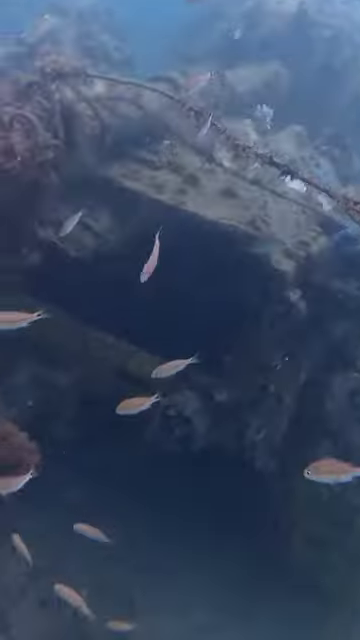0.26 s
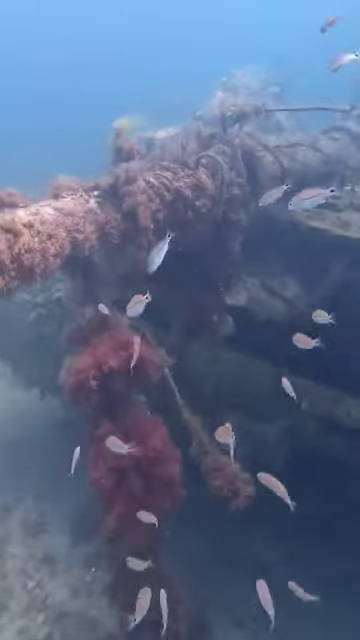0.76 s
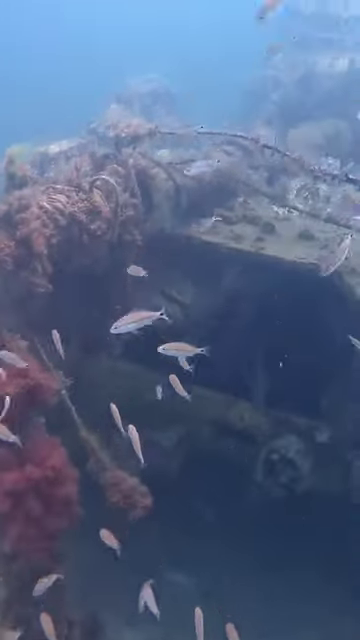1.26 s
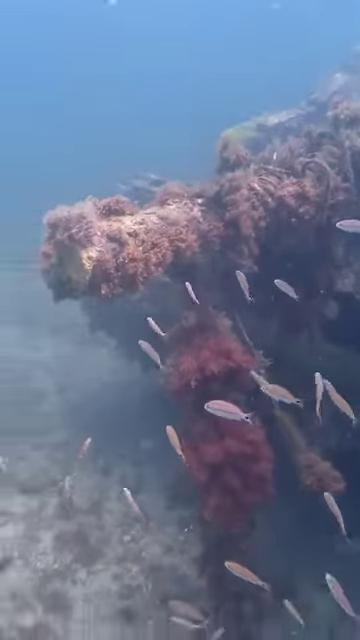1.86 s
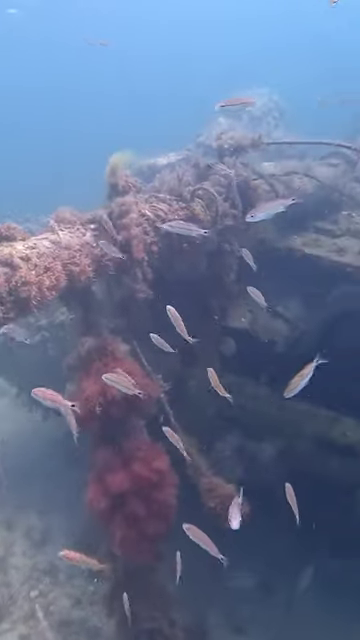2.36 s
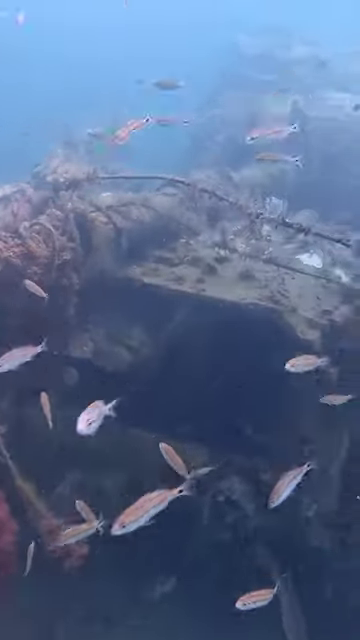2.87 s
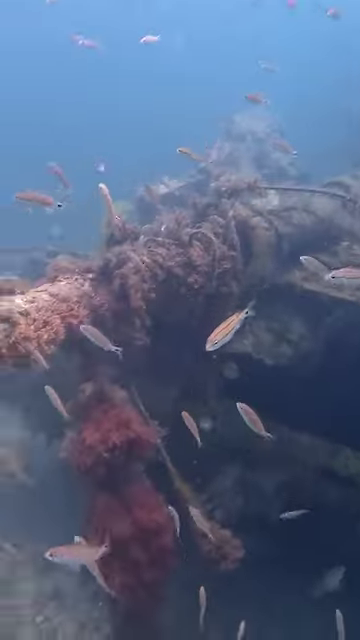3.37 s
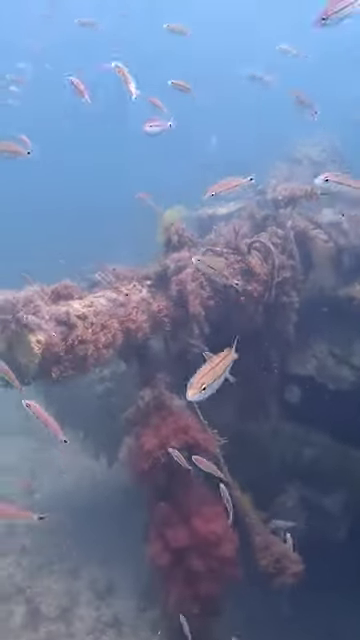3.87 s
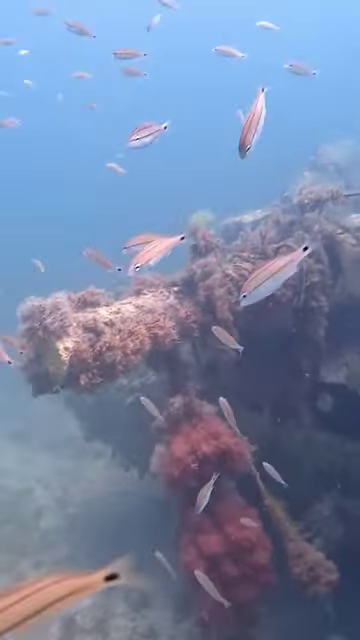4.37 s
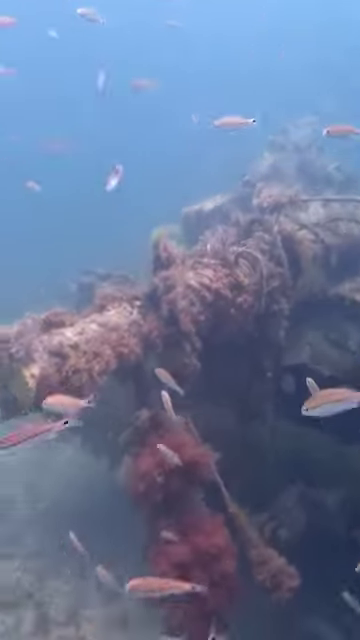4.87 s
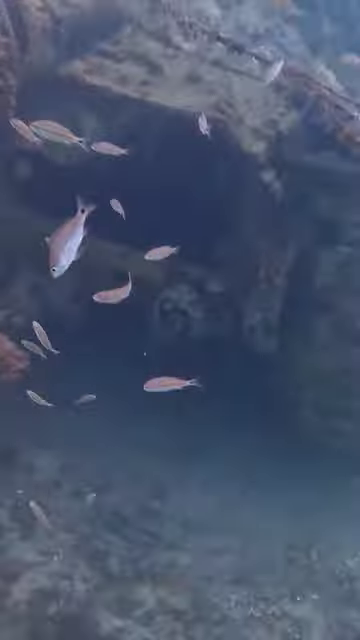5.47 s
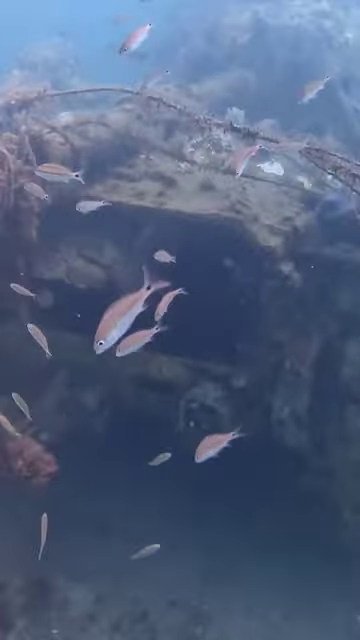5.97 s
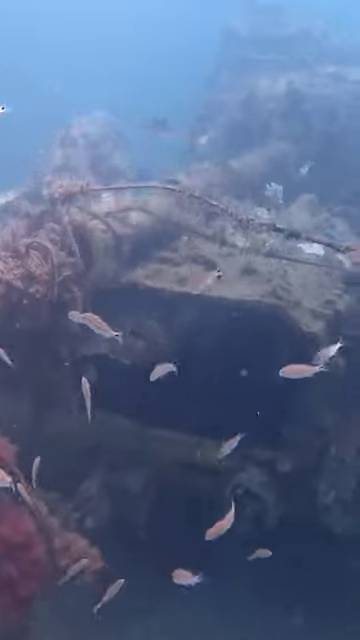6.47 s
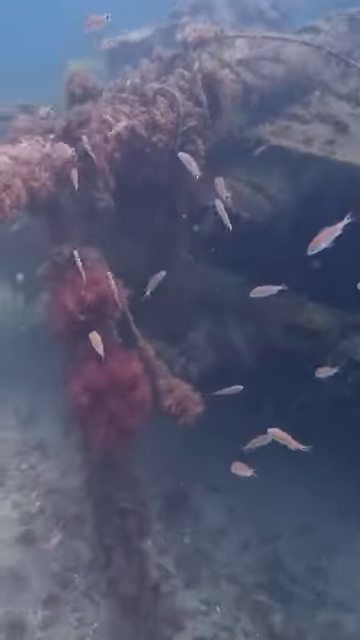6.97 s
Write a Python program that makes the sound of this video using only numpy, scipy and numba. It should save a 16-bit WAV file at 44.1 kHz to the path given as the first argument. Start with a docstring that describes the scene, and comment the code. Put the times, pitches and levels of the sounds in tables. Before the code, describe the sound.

Dull, low buffeting of water opens the scene, heard from a camera swaying under the sea in a sealed case. Irregular clicks of snapping shrimp ring briefly in the case all the way through. The water calms, then swells again about halfway, with small bubble pops and soft gurgles around it. A strong thumping surge arrives late and weaker ones follow. The rumble leans left, the clicks are brighter on the right.

```python
"""A camera in a sealed housing sways on a wreck under water. From the start, surges push eddies over its
two microphone ports, and snapping shrimp near and far set the housing ringing. The flow eases after 1.7 s;
near 3 s air pockets pop on the shell. A surge at 3.9 s is followed by more pops and by gurgling round the
seams. A strong surge comes at 5.8 s, weaker ones from 6.6 s. A faint hum runs throughout.
The left port is louder in the bass, the right in the treble."""
import sys
import numpy as np
from scipy import signal
from scipy.io import wavfile
from scipy.ndimage import uniform_filter1d
from numba import njit

SR = 44100
rng = np.random.default_rng(int(sys.argv[2]) if len(sys.argv) > 2 else 0)


def digitize_waveform(pressure):
    """Quantize a signal to 16-bit integers and store it at the path in sys.argv[1].

    Rows of a 2-D input are taken as channels; values are limited to [-1, 1].
    """
    field = np.atleast_2d(pressure).T
    bounded = np.clip(field, -1, 1)
    quanta = np.round(bounded * 32767).astype(np.int16)
    wavfile.write(sys.argv[1], SR, quanta)


N = 318843

# flow over the ports: time_s, level_db, small_eddy_db
SURGE_CURVE = [(0.0, -19.5, -7), (0.16, -22, -6), (0.22, -28, -18), (0.4, -32, -16.5), (0.47, -14.5, -9.5),
               (0.53, -29.5, -2.5), (0.58, -15, 0.5), (0.63, -28.5, -1), (0.7, -23, -4.5),
               (0.88, -22.5, -10), (0.97, -37.5, -12), (1.03, -22.5, -12.5), (1.15, -43.5, -7),
               (1.3, -25, -7), (1.38, -14, -1.5), (1.43, -18.5, -12.5), (1.5, -18, -4),
               (1.56, -19.5, -12.5), (1.61, -25.5, -14.5), (1.66, -25, -10), (1.83, -44, -21),
               (2.05, -40.5, -27), (2.13, -21, -13), (2.17, -26.5, -21.5), (2.29, -28.5, -9),
               (2.41, -25, -22), (2.5, -37.5, -24), (2.66, -47, -4), (2.86, -31.5, -7.5),
               (2.94, -38.5, 0.5), (3.06, -27.5, -11.5), (3.22, -33, -11), (3.26, -24.5, -22.5),
               (3.36, -37, -8), (3.54, -34, -26.5), (3.79, -35.5, -25), (3.85, -16, -9), (3.99, -20, -5.5),
               (4.05, -28.5, -17.5), (4.11, -16, -18), (4.17, -36, -27), (4.33, -48.5, -1),
               (4.81, -25, -13), (4.87, -23.5, -16.5), (4.97, -14.5, -18), (5.15, -33, -11.5),
               (5.38, -27.5, -21), (5.48, -51, -15), (5.56, -23.5, -18), (5.68, -38, -2.5),
               (5.76, -12.5, -3), (5.86, -25.5, -3.5), (5.94, -19, -14), (6.08, -32.5, -14.5),
               (6.12, -27, -29), (6.34, -33, -13.5), (6.4, -23, -17.5), (6.5, -38.5, -5.5),
               (6.6, -24.5, -9), (6.7, -17.5, -11.5), (6.78, -16.5, -15.5), (6.83, -35, -12.5),
               (6.91, -28.5, -25), (6.97, -50.5, -14), (7.15, -23, -26), (7.23, -18.5, -15.5)]
# strongest eddies: centre_s, level_db, pitch_hz
EDDY_THUMPS = [(0.017, -22, 117), (0.091, -18, 127), (0.153, -18, 100), (0.438, -21.0, 86.5),
               (0.483, -11.5, 164), (0.512, -9.5, 191), (0.541, -14, 172), (0.568, -8.5, 128),
               (0.592, -6.5, 168), (0.604, -28, 230), (0.644, -11.5, 206), (0.677, -15.5, 120),
               (0.692, -14, 130), (0.718, -34, 173.0), (0.765, -17, 87.5), (0.822, -23.5, 101),
               (1.031, -21, 67), (1.236, -27, 70), (1.339, -18, 54.5), (1.356, -12.5, 103),
               (1.393, -12, 223), (1.444, -14.5, 58.7), (1.472, -11.5, 86.5), (1.497, -14, 168),
               (1.527, -18, 101.0), (1.584, -24.0, 77.0), (1.656, -30, 44.7), (2.137, -14, 76.4),
               (2.207, -22, 65), (2.391, -21, 67.4), (2.819, -28, 90), (2.843, -32, 100), (2.865, -30, 100),
               (2.887, -32, 109), (2.972, -33, 120), (3.056, -30, 110), (3.123, -30, 85),
               (3.249, -30, 50.5), (3.268, -17, 43.4), (3.85, -13, 88.0), (3.891, -18.5, 101.0),
               (3.957, -11.5, 113), (3.99, -10.5, 150), (4.108, -19, 52), (4.158, -28, 59),
               (4.578, -32, 89), (4.649, -29, 90), (4.728, -24.5, 89), (4.786, -20, 77.0),
               (4.81, -15.5, 45), (4.844, -18, 49.7), (4.899, -19, 80), (4.918, -15.5, 51.6),
               (4.976, -19.5, 66), (5.026, -20.5, 67), (5.21, -25.5, 113), (5.251, -26.5, 70),
               (5.295, -25.5, 59.7), (5.37, -21, 87), (5.553, -23, 65), (5.581, -19, 70),
               (5.602, -23.5, 132.0), (5.74, -11, 61), (5.762, -9.5, 158), (5.792, -6.5, 133),
               (5.805, -16, 172), (5.827, -24, 152.0), (5.881, -15, 145), (5.948, -19, 100),
               (5.974, -16.5, 70.6), (6.022, -33, 80), (6.064, -27, 89), (6.099, -23, 55),
               (6.179, -24.5, 50), (6.251, -26.5, 55.3), (6.416, -29.5, 70), (6.529, -26, 80),
               (6.607, -15.5, 68), (6.648, -15.5, 65.5), (6.672, -17, 70), (6.704, -22, 101.0),
               (6.757, -18, 129), (6.787, -16, 87.5), (6.839, -29, 70), (6.872, -28.5, 70),
               (6.913, -31, 60), (7.161, -16, 59.0), (7.189, -19.5, 98)]
# loud near snaps: start_s, level_db at each of BANDS_HZ, echo_db
LOUD_SNAPS = [(0.1015, -58, -30, -26.5, -42, -44, -47, -40), (0.167, -46, -48, -26.5, -42, -41, -47, -26.5),
              (0.268, -30, -37, -35, -47, -62, -54, -23), (0.3929, -60, -41, -28, -32, -35, -44, -29),
              (0.4906, -23, -3.5, -9, -28, -41, -51, -30.5),
              (0.6534, -39, -46, -23.5, -25.5, -27, -46, -31), (0.7115, -28, -26, -19, -35, -56, -68, -27),
              (0.738, -39, -39.0, -35, -36, -38, -44, -24), (0.801, -75.0, -43, -25.5, -31, -52, -54, -38),
              (0.845, -45, -35, -21.5, -43, -55, -62.0, -22), (0.962, -38, -31, -37, -40, -46, -55, -19),
              (1.0834, -53, -39, -28.5, -47, -70, -56.0, -23), (1.2004, -50, -34, -27, -27, -36, -50, -26),
              (1.2093, -23.5, -23, -19, -32, -42, -47.0, -43),
              (1.369, -50.0, -38, -25.5, -29, -27.5, -62, -22.5),
              (1.401, -35, -38, -35, -35.5, -34, -38, -22.5),
              (1.4101, -39.0, -45, -23, -40, -49, -44.0, -47),
              (1.461, -67.0, -62, -40, -34.5, -45, -51, -36),
              (1.5128, -70, -46, -32.5, -39, -40.5, -57, -23),
              (1.5395, -35, -45, -24.5, -45, -45, -50, -42),
              (1.7807, -34, -21, -28.5, -37, -39.5, -59, -33),
              (1.8743, -66, -46, -36, -31, -34, -38, -27.5), (2.0695, -64, -53, -39, -44, -40.0, -50, -19),
              (2.0866, -71, -50, -45, -44, -33, -54, -38),
              (2.1585, -52, -46, -27.5, -32.5, -41, -41.0, -24.5),
              (2.2101, -56, -29, -31, -55.0, -68, -68.0, -30.5),
              (2.3244, -72.0, -60.0, -33, -39, -34, -35, -37), (2.342, -75.0, -44, -39, -43, -36, -43, -30),
              (2.3542, -58.0, -31.5, -33, -42, -49, -48, -22.5),
              (2.4877, -76.0, -50, -37.5, -44.5, -49, -55.0, -16),
              (2.583, -51, -61.0, -37, -33, -35.5, -37, -29), (2.5967, -51, -46, -30, -41.0, -35, -49, -34),
              (2.623, -45, -18, -14.5, -19.5, -35, -36.0, -48),
              (2.7366, -58, -52, -31, -27.5, -34, -32, -33), (2.7526, -53, -45, -37, -31, -50, -49.0, -35),
              (2.7762, -54.0, -39.0, -47, -45, -31, -37, -38), (2.9135, -52, -41, -22, -23, -29, -33, -30),
              (2.9885, -56, -42, -32, -35.5, -38, -50, -20.5),
              (3.0335, -43.0, -35, -25, -32, -41, -60, -17.5),
              (3.069, -54.0, -20, -33, -63.0, -64, -67.0, -39),
              (3.1014, -59, -56, -41, -53, -45, -54.0, -19), (3.165, -35, -36, -14, -33.5, -40, -47, -24),
              (3.3038, -42, -53, -24, -42, -35.5, -47, -20.5),
              (3.3241, -41.0, -44, -23.5, -59, -51.0, -68.0, -28),
              (3.3984, -40, -22, -28, -52, -51, -68.0, -32),
              (3.4844, -61.0, -44, -27, -34, -45, -48, -21.5),
              (3.5403, -42, -39, -23, -34, -67.0, -54.0, -20.5),
              (3.5802, -54, -49, -32.5, -33, -31, -39, -21.5), (3.745, -51.0, -21, -29, -41, -36, -36, -27),
              (3.7721, -64.0, -40, -22, -32.5, -29, -38, -30),
              (3.7773, -41, -29, -16.5, -32.0, -28.5, -46, -22.5),
              (3.8097, -44, -48, -27, -37, -47, -44, -13.5),
              (3.8263, -52, -38, -19.5, -28.5, -31, -52, -27), (3.9003, -77, -43, -42, -44, -46, -49, -17),
              (3.9463, -37, -36, -17.5, -47, -44, -45.0, -24.5),
              (3.9757, -52.0, -43, -41, -27.5, -30.5, -35.0, -33),
              (3.9942, -45, -21.5, -17.5, -29, -43, -39.0, -24),
              (4.0945, -40, -33.0, -31.5, -42, -36.5, -42, -21.5),
              (4.114, -51, -32, -22.5, -48.0, -50, -50.0, -26),
              (4.1868, -33, -39, -20, -39.5, -47, -47.0, -16.5),
              (4.225, -63, -38, -23.5, -56, -53, -53, -18.5), (4.2551, -36, -37, -22, -39, -55, -53.0, -22),
              (4.3364, -24, -15, -19.5, -49, -72.0, -52.0, -43),
              (4.3673, -31, -39, -24.5, -63, -62, -60, -17.5),
              (4.4413, -45, -49, -33, -32.5, -39, -44, -21.5),
              (4.457, -53.0, -39, -23, -30, -32, -56, -29.5),
              (4.4966, -34, -29, -29, -35.5, -47, -66.0, -22.5),
              (4.5297, -61, -34, -42, -35, -36, -49, -47),
              (4.554, -48.0, -30, -28.5, -41, -35.5, -55, -18.5),
              (4.6304, -26, -33.0, -36, -64, -71.0, -58.0, -39),
              (4.695, -27, -21, -24, -71, -70.0, -71.0, -41), (4.709, -35, -21, -28.5, -50, -40, -70, -20),
              (4.729, -25, -39.0, -37, -52.0, -49, -56.0, -26),
              (4.751, -45, -32, -35, -42, -36.5, -34, -24.5), (4.7965, -43, -33, -30, -41, -62, -62, -27),
              (4.8772, -55, -29.5, -29.5, -28.5, -35, -59, -20),
              (4.9823, -42, -35, -35, -41, -38, -61, -18), (4.9891, -34, -33, -27, -32, -43, -44, -24),
              (5.0166, -67, -48, -45, -37, -39, -50.0, -34.0), (5.0514, -68, -39, -26, -35, -34, -55, -31),
              (5.0786, -53.0, -26, -25, -38, -43, -50.0, -24),
              (5.1365, -63.0, -27, -27.5, -45, -47, -71.0, -26),
              (5.1994, -50.0, -36, -12.5, -26.5, -39, -44, -42),
              (5.2333, -38, -31, -35, -35, -35.5, -38, -27),
              (5.2645, -45, -47.0, -19.5, -64.0, -61, -63, -34),
              (5.2976, -38, -33.0, -34, -37, -51, -42.0, -20),
              (5.3303, -45, -50, -19, -50.0, -52, -71.0, -23), (5.342, -50, -29, -20, -22, -34, -32, -19.5),
              (5.3766, -45, -14, -16.5, -30, -63, -55.0, -30),
              (5.394, -40, -23, -49.0, -59.0, -72.0, -69.0, -20),
              (5.444, -39, -16, -20, -36, -41, -46, -21), (5.4759, -64.0, -36, -34, -34.5, -53, -39.0, -25),
              (5.543, -51, -19, -22.5, -50, -67, -70.0, -34),
              (5.5509, -58, -41.0, -51, -30.5, -35.5, -55, -28),
              (5.623, -43.0, -20, -20, -43, -36, -58, -23.5),
              (5.6635, -48, -39, -21, -23.0, -27.5, -47, -23.5),
              (5.6755, -46, -36, -16, -18, -33, -30, -36), (5.692, -45, -36, -21.5, -29, -27.5, -46, -21),
              (5.7564, -34, -27, -20.5, -27, -43, -33, -27), (5.777, -42, -34, -28, -52, -55, -45.0, -23),
              (5.789, -57, -42, -31, -32, -35.5, -40, -26), (5.8712, -50, -35, -28, -28.5, -32, -38, -46),
              (5.936, -62.0, -42, -28.5, -36, -34.5, -45, -39),
              (5.9922, -50, -49, -25, -34, -40, -42, -22.5),
              (6.0122, -55.0, -59.0, -37, -41, -29, -36, -35),
              (6.0247, -48, -36, -21.5, -26, -32, -47, -24.5),
              (6.05, -62.0, -44, -35, -30, -29.5, -51, -36),
              (6.1064, -46.0, -37, -18.5, -32, -46, -60, -24.5),
              (6.1546, -47, -43, -32.5, -35, -44, -46, -18.5),
              (6.2109, -53.0, -34, -22, -39, -40, -42, -34), (6.218, -32, -14, -40, -42, -45, -53.0, -26),
              (6.2312, -51, -28, -29, -43, -33, -67, -26),
              (6.3791, -51.0, -38.0, -28, -38, -35, -45, -36.0),
              (6.4094, -39, -25, -26.5, -50, -59.0, -54.0, -24.5),
              (6.439, -47, -44, -33, -43, -42, -42, -21), (6.504, -52, -42, -23.5, -45, -47, -46, -30),
              (6.511, -65, -48, -30, -38, -36, -52, -23.5), (6.5533, -25, -14, -22.5, -37, -60, -57.0, -35),
              (6.586, -25.5, -33, -33, -58, -75, -63, -40), (6.6507, -49, -38, -23, -39, -62, -44.0, -28),
              (6.711, -58, -37, -25, -60, -46, -75, -22), (6.7641, -39, -42, -30.5, -39, -34.5, -49, -24),
              (6.8759, -51, -43, -26.5, -31, -31, -48, -33), (6.9201, -73.0, -51, -30, -33, -41, -47, -24),
              (7.0158, -64, -49, -37, -37, -42, -53.0, -36),
              (7.0262, -59.0, -38, -25.5, -66.0, -58.0, -67.0, -50),
              (7.1896, -52.0, -30, -22, -31.5, -27.5, -42, -49)]
# small near snaps: start_s, level_db at each of BANDS_HZ but the first
SMALL_SNAPS = [(0.191, -59, -54, -54, -45, -63), (0.2505, -51, -34, -35, -59, -56),
               (0.4161, -62, -56, -44, -48, -41), (0.5521, -59, -33, -68, -64, -67),
               (0.637, -68, -47, -38.5, -45, -53), (0.7209, -39, -30, -40, -46, -60),
               (0.7879, -66, -55, -37, -53, -61), (0.8333, -63, -26.5, -64, -59, -64),
               (0.8756, -53, -38, -41, -42, -46), (0.949, -58, -38, -50, -45, -55),
               (0.986, -52, -43, -37, -44, -52), (1.4896, -56, -38, -40, -53, -52),
               (1.5294, -69, -54, -47, -45, -43), (1.7022, -66, -37, -43, -47, -54),
               (1.768, -53, -41, -43, -40, -56), (1.935, -48, -31, -37.5, -40, -53),
               (2.1062, -50, -33, -61, -66, -69), (2.1819, -64, -47, -44, -44, -53),
               (2.319, -51, -37, -41, -40, -45), (2.3941, -42, -35, -39, -62, -55),
               (2.5483, -51, -30, -51, -65, -66), (2.648, -56, -54, -49, -39, -63),
               (2.6791, -42, -33, -39, -49, -65), (2.7051, -34, -34, -58, -37, -36),
               (2.7274, -46, -37, -44, -54, -57), (2.7455, -41, -32, -52, -53, -46),
               (2.8653, -60, -50, -47, -41, -45), (3.0163, -60, -31, -49, -55, -67),
               (3.1762, -44, -22, -37, -42, -54), (3.2192, -60, -51, -43, -50, -41),
               (3.2651, -47, -53, -54, -40, -43), (3.3557, -46, -44, -51, -57, -48),
               (3.43, -50, -47, -47, -40, -42), (3.6771, -53, -43, -36, -36, -45),
               (3.9199, -62, -53, -39, -50, -58), (3.9281, -41, -31, -51, -49, -67),
               (4.2386, -57, -33, -42, -45, -56), (4.3297, -61, -53, -46, -57, -53),
               (4.3517, -32, -47, -49, -69, -64), (4.3861, -53, -41, -54, -49, -59),
               (4.6433, -53, -30, -54, -42, -41), (4.8265, -55, -33, -63, -55, -69),
               (4.9056, -48, -28.5, -51, -42, -60), (5.0387, -60, -53, -60, -44, -48),
               (5.1467, -59, -55, -48, -38, -42), (5.4636, -53, -36, -38, -42, -52),
               (5.4876, -46, -51, -42, -52, -66), (5.5749, -62, -36, -45, -42, -54),
               (5.6524, -44, -30, -32, -54, -59), (5.7271, -56, -46, -51, -32, -57),
               (5.767, -45, -36, -38, -35, -41), (5.8266, -50, -35, -35.5, -42, -46),
               (5.8878, -46, -34, -44, -52, -67), (5.9022, -56, -33, -50, -38, -44),
               (5.9814, -51, -55, -38, -38, -48), (6.1237, -56, -29, -43, -41, -62),
               (6.1774, -48, -35, -34.5, -42, -46), (6.4763, -59, -30, -40, -58, -61),
               (6.662, -62, -39, -48, -55, -46), (6.6984, -63, -47, -49, -41, -53),
               (6.8011, -48, -31, -60, -54, -67), (6.9043, -66, -56, -38, -47, -47),
               (6.9694, -54, -25, -65, -63, -67), (6.9884, -43, -54, -43, -41, -47),
               (7.0561, -62, -43, -46, -37, -49), (7.0736, -50, -42, -49, -45, -54),
               (7.0992, -64, -33.5, -35, -53, -64), (7.1753, -49, -41, -65, -59, -63)]
# housing resonances: pitch_hz, t60_s, left_db, right_db, right_lead_rad
HOUSING_MODES = [(480, 0.0071, -28, -1.5, 2.5), (690, 0.029, -5.5, -18.5, 1.5),
                 (1282, 0.0035, -17, -10, 2.4), (1638.5, 0.017, -6.5, -14.5, 0.5),
                 (1767, 0.028, -11.5, -20.5, 4), (1893, 0.041, -22, -14.5, 0.23),
                 (2304, 0.017, -14.5, -14.5, 4.5), (2500, 0.0043, -8.5, -49, 4.5),
                 (3213, 0.01, -9.5, -6.5, -8.5), (3457, 0.017, -15.5, -7.5, 1.51),
                 (4385, 0.0019, -14, 4.5, 1.77), (5186, 0.006, -18, 0, 7), (6660, 0.0034, -29, 2.5, 2),
                 (7460, 0.0043, -52, -6, 5), (10600, 0.002, -35, -4.5, 2), (11900, 0.0039, -14.5, -14, 0.5),
                 (13000, .002, -10, -8.5, 2), (15000, .002, -14.5, -10.5, 5.5),
                 (1000, 0.018, -39, -16.5, 5.5), (1425, 0.011, -17, -16.5, 1.17)]
# far shrimp and wash: time_s, mid_db, treble_db
COLONY_CURVE = [(0.0, -48.5, -56), (0.76, -48, -59), (1.15, -49, -58), (1.33, -48, -55.5),
                (1.75, -50, -61.5), (1.95, -51, -56), (2.2, -46, -55.5), (2.58, -46, -58.5),
                (2.74, -42, -51.5), (3.24, -45, -52.5), (3.79, -40.5, -52), (4.01, -48.5, -55.5),
                (4.53, -44, -55.5), (5.64, -43, -54), (6.04, -47.5, -54.5), (6.22, -48, -58),
                (6.6, -48, -56.5), (6.95, -46, -53.5), (7.23, -44, -55)]
# air pockets on the shell: start_s, level_db, pitch_hz
AIR_POPS = [(0.49, -42, 266), (0.752, -23.5, 270), (1.208, -28, 260), (1.354, -36, 480), (1.389, -33, 550),
            (1.99, -35, 700), (2.46, -44, 680), (2.825, -34.5, 300), (2.881, -27, 262), (3.025, -28, 300),
            (3.053, -27.5, 298), (3.108, -28, 750), (3.166, -28, 510), (3.235, -28, 526), (3.305, -38, 700),
            (3.981, -23, 248), (4.097, -29.5, 320), (4.286, -22.5, 802), (4.337, -24.5, 242),
            (4.411, -33, 649), (4.514, -29, 239), (4.63, -24, 254), (4.68, -21.5, 248), (4.716, -28, 750),
            (4.731, -32, 320), (4.74, -25, 266), (4.752, -31, 550), (4.766, -29, 600), (4.782, -30, 400),
            (4.855, -22.5, 243), (5.402, -25, 690), (6.23, -19, 830), (6.361, -39, 635), (6.521, -29, 799),
            (6.553, -15.5, 504)]
# bubbles leaving the seams: start_s, level_db, pitch_hz, t60_s
SEAM_BUBBLES = [(1.233, -42.5, 630, 0.17), (1.654, -50, 774, 0.16), (2.258, -36, 634, 0.043),
                (3.194, -27, 594, 0.041), (3.788, -30, 596, 0.13), (4.675, -32.5, 576, 0.081),
                (4.799, -60, 465, 0.091), (5.447, -30.5, 677, 0.064), (5.828, -30, 606, 0.051),
                (6.361, -38, 630, 0.061)]
# water round the seams: time_s, level_db
GURGLE_CURVE = [(0.04, -43), (0.45, -56.5), (0.49, -29), (0.51, -56), (1.1, -54), (1.22, -43), (1.3, -59),
                (1.4, -36), (1.73, -62), (2.7, -61), (2.86, -46), (2.96, -59), (3.06, -38.5), (3.15, -45.5),
                (3.23, -45), (3.36, -53), (3.42, -49), (3.63, -63), (3.81, -50.5), (3.86, -60.5),
                (4.55, -45), (4.7, -35.5), (4.79, -40), (4.83, -42), (5.17, -57), (5.44, -39), (5.52, -58),
                (5.84, -45), (5.88, -58), (6.51, -50), (6.55, -38), (6.58, -49), (6.7, -46), (6.8, -42.5),
                (6.86, -51.5), (7.12, -75)]
# water along the shell: centre_s, length_s, level_db
WATER_RUSHES = [(2.883, 0.04, -44.5), (3.05, 0.072, -50.5), (3.28, 0.18, -69), (3.418, 0.046, -55),
                (3.71, 0.15, -48), (4.35, 0.35, -60), (4.665, 0.055, -49.5), (5.397, 0.07, -49),
                (6.3, 0.033, -59), (6.812, 0.041, -50.5)]
# swell pressure on the ports: time_s, left_db, right_db
SWAY_CURVE = [(0.15, -29.5, -34), (0.55, -40, -39), (0.95, -41, -41), (1.35, -29.5, -31),
              (1.75, -38.5, -36), (2.15, -38, -39), (2.55, -40, -42), (2.95, -40, -34), (3.35, -47, -33),
              (3.75, -26, -28.5), (4.15, -36, -39), (4.55, -40, -36), (4.95, -26, -31), (5.35, -36, -34.5),
              (5.75, -31, -38), (6.15, -37, -37), (6.55, -32, -26), (6.95, -38, -38)]
# low hum: time_s, level_db
HUM_CURVE = [(0, -59.5), (1.7, -60), (2.1, -59), (2.7, -58), (3.5, -53.5), (4.2, -57), (5.6, -55.5),
             (6.2, -60), (7.23, -66)]

BANDS_HZ = [700, 1200, 1700, 3500, 6000, 11000]
EDDIES_PER_S, EDDY_HZ, EDDY_DB_PER_OCTAVE, EDDY_DAMPING = 320, 215.4, 9, 1.96
THUMP_WIDTH_CYCLES, THUMP_PULL_DB, RIGHT_LOWPASS_HZ = 0.49, -3, 235
SNAP_DRIVE_DB, SNAP_SPREAD_DB, PRECLICK_MAX_S, PRECLICK_DB = 9, 2.0, 0.0011, -17
SMALL_SNAP_BASS_DB, SMALL_SNAP_ECHO_DB = -68, -26
ECHOES_PER_S, ECHO_T60_S = 1300, 0.071  # t60 at 1700 Hz
COLONY_PER_S, COLONY_DRIVE_DB = 1200, -11.5
SOFT_SHELL_HZ, STIFF_SHELL_HZ, PORT_HZ, STOPBAND_HZ = 3370, 8640, 7270, 16200
SWAY_HZ, HUM_HZ = 15, 196


def surge():
    """Eddies pass the ports as low pressure lumps; one curve sets loudness, another how short they are."""
    level_db, small_eddy_db = curves(SURGE_CURVE)
    edge_hz = np.clip(EDDY_HZ * 2 ** (small_eddy_db / EDDY_DB_PER_OCTAVE), 25, 500)
    step_rad = 2 * np.pi * edge_hz / SR
    kicks = [grains(EDDIES_PER_S, spread_db=1.4) / np.sqrt(step_rad) for _ in range(3)]
    lumps = butter([swept_lowpass(x, step_rad, EDDY_DAMPING) for x in kicks], 26.6, "high", order=2)
    lumps /= np.sqrt(uniform_filter1d(lumps[0] ** 2, size=3500) + 1e-9)  # running rms
    gain = from_db(level_db + drift(19.4))
    left, right = gain * ports(*lumps, own_db=-10, right_db=-4, lag_s=0.0013) + thumps()
    return np.array([left, butter(right, RIGHT_LOWPASS_HZ, "low", order=2)])


def thumps():
    """A strong eddy: one push, then a weaker pull, under a bell envelope."""
    pad = SR // 2
    pressure = np.zeros(N + 2 * pad)
    t = np.arange(-SR // 10, SR // 10) / SR
    for centre_s, level_db, pitch_hz in EDDY_THUMPS:
        swing = -np.sin(2 * np.pi * pitch_hz * t) * np.where(t > 0, from_db(THUMP_PULL_DB), 1)
        bell = np.exp(-(t * pitch_hz / THUMP_WIDTH_CYCLES) ** 2 / 2)
        at = pad + round(centre_s * SR) - len(t) // 2
        pressure[at:at + len(t)] += np.sqrt(2) * from_db(level_db) * swing * bell
    return ports(pressure[pad:pad + N], right_db=-6.5, lag_s=0.0016)


def near_snaps():
    """Each snap strikes the housing, then its echoes off the wreck. Yields one drive per mode."""
    small = [(start_s, SMALL_SNAP_BASS_DB, *db, SMALL_SNAP_ECHO_DB) for start_s, *db in SMALL_SNAPS]
    start_s, *bands_db, echo_db = np.vstack([LOUD_SNAPS, small]).T
    at = np.round(start_s * SR).astype(int)
    echoes = [grains(ECHOES_PER_S, spread_db=0.5) for _ in range(3)]
    for k, (pitch_hz, *_) in enumerate(HOUSING_MODES):
        chance_db = SNAP_SPREAD_DB * rng.standard_normal(len(at))
        strike = from_db(band_weights(pitch_hz) @ bands_db + SNAP_DRIVE_DB + chance_db)
        direct, echo_onsets = np.zeros((2, N))
        direct[at], echo_onsets[at] = strike, strike * from_db(echo_db)
        ahead = (rng.uniform(0.2, 1, len(at)) * PRECLICK_MAX_S * SR).astype(int)
        direct[np.maximum(at - ahead, 0)] -= strike * from_db(PRECLICK_DB)
        t60_s = ECHO_T60_S * (1700 / pitch_hz) ** 0.27
        envelope = signal.lfilter([1], [1, -from_db(-60 / (t60_s * SR))], echo_onsets + 1e-18)
        yield direct + envelope * (echoes[0] + 0.66 * echoes[1 + k % 2])


def housing(near_drives, far_drives, water):
    """Snaps and rushing water ring the modes; the soft door dulls the low ones, thin caps pass the top."""
    soft, stiff, thin = np.zeros((3, 2, N))
    for k, (mode, near, (far, left_only)) in enumerate(zip(HOUSING_MODES, near_drives, far_drives)):
        pitch_hz, t60_s, left_db, right_db, lead_rad = mode
        treble = band_weights(pitch_hz)[3:].sum()
        drive = (-1) ** k * (near + far + (1 - treble) * water)
        left = from_db(left_db) * ring(drive + left_only, pitch_hz, t60_s)
        right = from_db(right_db) * ring(drive, pitch_hz, t60_s, lead_rad)
        if treble < 0.5:
            soft += [left, right]
        elif pitch_hz < STIFF_SHELL_HZ:
            stiff += [left, right]
        else:
            thin += [left, right]
    shell = butter(soft, SOFT_SHELL_HZ, "low", order=2) + butter(stiff, STIFF_SHELL_HZ, "low", order=4)
    return butter(shell + thin, 958, "high", order=2)


def pops():
    """An air pocket pops on the shell: one sharp push, a short ring."""
    pressure = np.zeros(N)
    for start_s, level_db, pitch_hz in AIR_POPS:
        at, kick = round(start_s * SR), np.zeros(SR // 20)
        kick[0] = from_db(level_db)
        pressure[at:at + len(kick)] += ring(kick, pitch_hz, t60_s=8.1 / pitch_hz, lead_rad=0.096)[:N - at]
    return ports(butter(pressure, 2600, "low", order=2), right_db=-9)


def bubbles():
    """A bubble swells in a few ms and rings, rising slightly in pitch."""
    pressure = np.zeros(N)
    for start_s, level_db, pitch_hz, t60_s in SEAM_BUBBLES:
        at = round(start_s * SR)
        t = np.arange(min(N - at, SR // 4)) / SR
        envelope = (1 - np.exp(-t / 0.00098)) * from_db(level_db - 60 * t / t60_s)
        pressure[at:at + len(t)] += envelope * np.sin(2 * np.pi * pitch_hz * t * (1 + 0.58 * t))
    return ports(pressure, right_db=-3.5)


def gurgle():
    """Small pockets of water and air shift in the seams and ring briefly."""
    pitches_hz, layers = np.geomspace(300, 1400, 8), []
    for _ in range(3):
        clicks = grains(900 * from_db(2.5 * drift(14)), spread_db=3.5)
        pocket = rng.integers(0, len(pitches_hz), N)
        ringing = sum(ring(clicks * (pocket == k), hz, t60_s=1.28 / hz) for k, hz in enumerate(pitches_hz))
        layers.append(butter(unit_rms(ringing), 1800, "low", order=2))
    gain = from_db(curves(GURGLE_CURVE)[0] + 4 * drift(18.4))
    return gain * ports(*layers, own_db=-6, right_db=-7.5)


def far_colony():
    """Far snaps from three directions, blurred by reverberation. Yields (shared, left only) per mode."""
    mid_db, treble_db = curves(COLONY_CURVE)
    clumps = drift(60)
    mid_gain = from_db(mid_db + COLONY_DRIVE_DB + 0.71 * clumps + 3.17 * drift(14.4))
    treble_gain = from_db(treble_db + COLONY_DRIVE_DB + 0.68 * clumps + 2.96 * drift(15))
    snaps = [grains(COLONY_PER_S * from_db(3 * drift(9)), spread_db=5.5) for _ in range(3)]
    crackle = snaps + 0.69 * rng.standard_normal((3, N))
    for k, (pitch_hz, *_) in enumerate(HOUSING_MODES):
        weights = band_weights(pitch_hz)
        treble = weights[3:].sum()
        gain = (1 - treble) * from_db(-14 * weights[0] - 12.3 * weights[1]) * mid_gain
        gain += treble * from_db(-6 * weights[5]) * treble_gain
        shared = gain * (0.76 * crackle[0] + 1.003 * crackle[1 + k % 2])
        yield shared, 0.54 * treble * gain * crackle[2 - k % 2]


def rushes():
    """Water slides along the shell: noise that swells and fades."""
    t = np.arange(N) / SR
    envelope = sum(from_db(level_db) * np.exp(-(2 * (t - centre_s) / length_s) ** 2)
                   for centre_s, length_s, level_db in WATER_RUSHES)
    return envelope * rng.standard_normal(N)


def sway():
    """The swell heaves on each port separately, more felt than heard."""
    heave = butter(rng.standard_normal((2, N)), SWAY_HZ, "low", order=4)
    return from_db(curves(SWAY_CURVE)) * unit_rms(butter(heave, 3, "high", order=1))


def hum():
    """Faint wavering hum: noise through one resonance."""
    tone = unit_rms(ring(rng.standard_normal(N), HUM_HZ, t60_s=0.041))
    gain = from_db(curves(HUM_CURVE)[0] + 1.5 * drift(3.3))
    return ports(gain * tone, right_db=-6.5)


def hiss():
    """Faint preamp noise."""
    return from_db(-77.5) * butter(rng.standard_normal((2, N)), 3500, "low", order=2)


def ports(shared, left_own=0, right_own=0, *, right_db, own_db=0, lag_s=0.00025):
    """Shared pressure, later on the left and weaker on the right, plus each port's own."""
    late = np.interp(np.arange(N) - lag_s * SR, np.arange(N), shared)
    own_gain = from_db(own_db)
    return np.array([late + own_gain * left_own, from_db(right_db) * (shared + own_gain * right_own)])


def grains(per_s, spread_db):
    """Random clicks of either sign, mostly small; rms 1."""
    born = rng.random(N) < per_s / SR
    size_db = spread_db * np.minimum(rng.exponential(1, born.sum()), 5)
    clicks = np.zeros(N)
    clicks[born] = from_db(size_db) * rng.choice([-1, 1], born.sum())
    return unit_rms(clicks)


def drift(rate_hz):
    """Slow random wander, rms about 1."""
    hop, settle = 40, 2000
    pole = np.exp(-2 * np.pi * rate_hz * hop / SR)
    noise = rng.standard_normal(N // hop + settle + 2)
    slow = signal.lfilter([1], [1, -2 * pole, pole * pole], noise)[settle:]
    return np.interp(np.arange(N) / hop, np.arange(len(slow)), unit_rms(slow))


def ring(clicks, pitch_hz, t60_s, lead_rad=0):
    """Resonator: a unit click starts a decaying unit sine at phase lead_rad."""
    r, w = from_db(-60 / (t60_s * SR)), 2 * np.pi * pitch_hz / SR
    numerator = [np.sin(lead_rad), r * np.sin(w - lead_rad)]
    return signal.lfilter(numerator, [1, -2 * r * np.cos(w), r * r], clicks + 1e-18)


@njit
def swept_lowpass(x, step_rad, damping):
    """Two 2-pole low-passes with a moving edge; rounds clicks into lumps."""
    out, low, band = np.empty_like(x), np.zeros(2), np.zeros(2)
    for i in range(len(x)):
        v = x[i]
        for k in range(2):
            band[k] += step_rad[i] * (v - low[k] - damping * band[k])
            low[k] += step_rad[i] * band[k]
            v = low[k]
        out[i] = v
    return out


def band_weights(pitch_hz):
    """Log-frequency interpolation weights over BANDS_HZ."""
    return np.array([np.interp(np.log(pitch_hz), np.log(BANDS_HZ), row) for row in np.eye(6)])


def curves(rows):
    """Table columns interpolated per sample."""
    time_s, *columns = np.transpose(rows)
    return [np.interp(np.arange(N) / SR, time_s, column) for column in columns]


def butter(x, edge_hz, kind, order):
    return signal.sosfilt(signal.butter(order, edge_hz, kind, fs=SR, output="sos"), x)


def from_db(db):
    return 10 ** (np.asarray(db) / 20)


def unit_rms(x):
    return x / np.sqrt(np.mean(x ** 2) + 1e-20)


def scene():
    """All sources at the two ports, over the preamp hiss."""
    noise_floor = hiss()
    water = surge() + gurgle() + pops() + bubbles()
    ringing = housing(near_snaps(), far_colony(), rushes())
    return water + ringing + sway() + hum() + noise_floor


def record(dry):
    """Sealed ports dull the treble; then soft clip and steep top cut."""
    dull = butter(dry, PORT_HZ, "low", order=3)
    rounded = 0.91 * np.tanh(dull / 0.94)
    return signal.sosfilt(signal.cheby2(18, 60, STOPBAND_HZ, fs=SR, output="sos"), rounded)


dry = scene()
out = record(dry)
digitize_waveform(out)
```